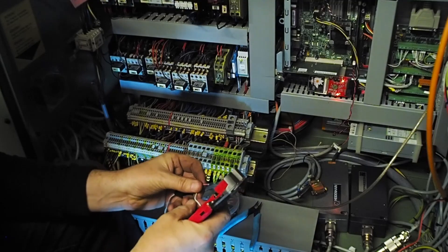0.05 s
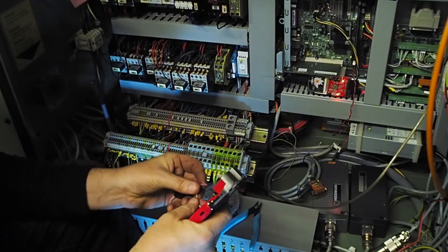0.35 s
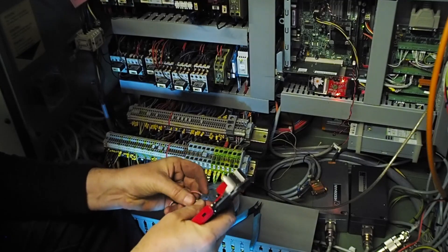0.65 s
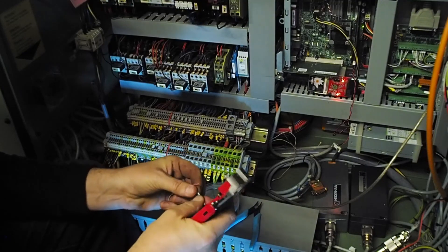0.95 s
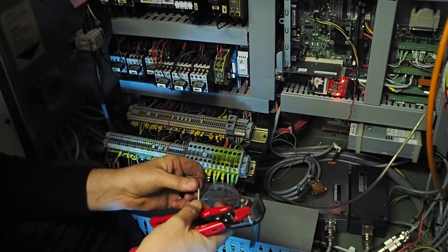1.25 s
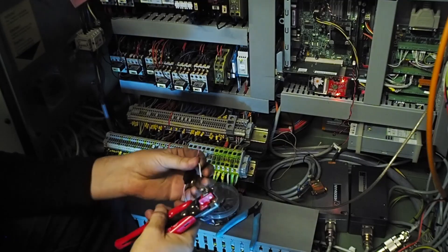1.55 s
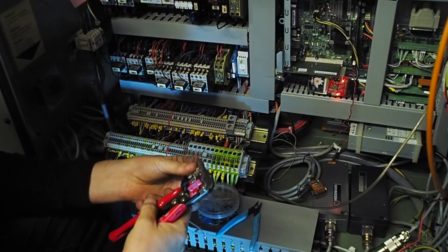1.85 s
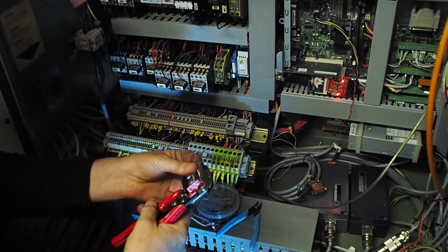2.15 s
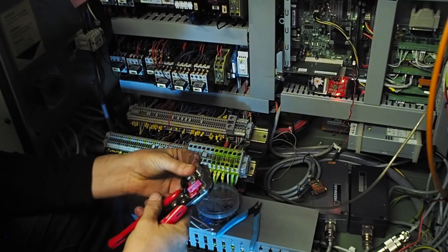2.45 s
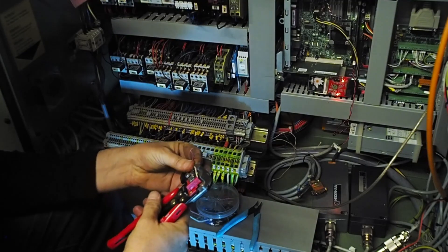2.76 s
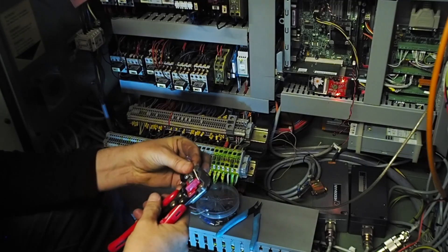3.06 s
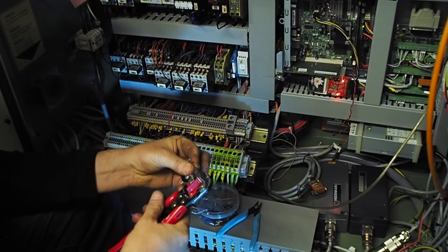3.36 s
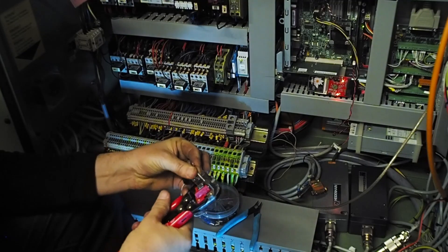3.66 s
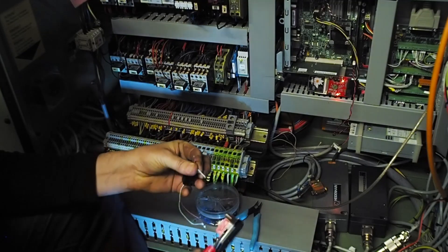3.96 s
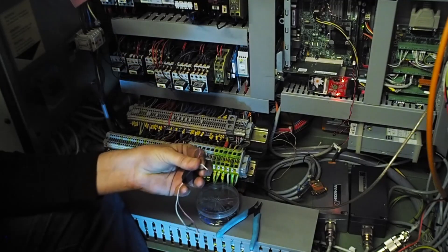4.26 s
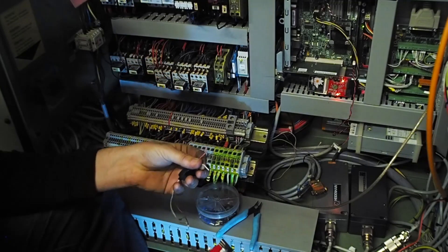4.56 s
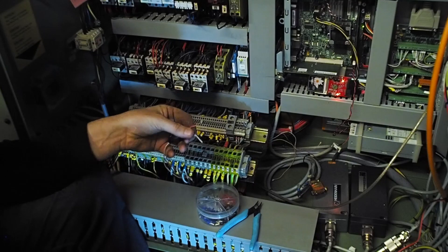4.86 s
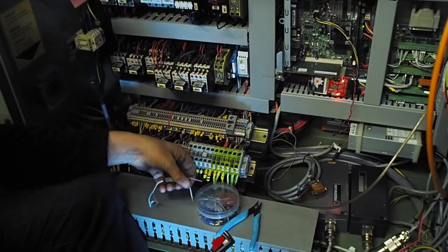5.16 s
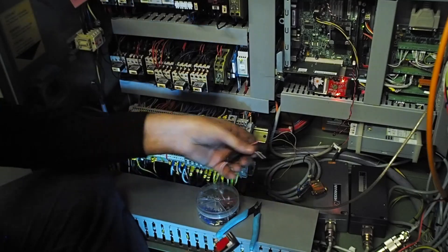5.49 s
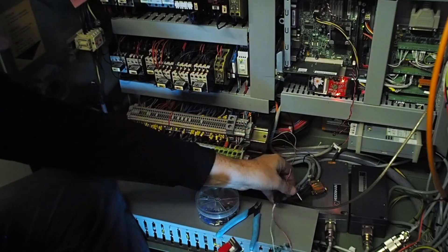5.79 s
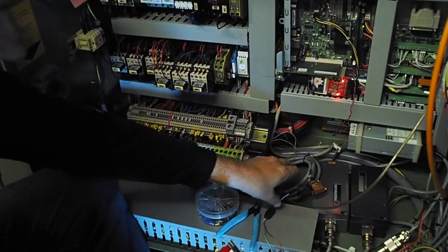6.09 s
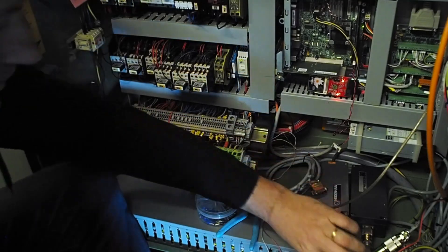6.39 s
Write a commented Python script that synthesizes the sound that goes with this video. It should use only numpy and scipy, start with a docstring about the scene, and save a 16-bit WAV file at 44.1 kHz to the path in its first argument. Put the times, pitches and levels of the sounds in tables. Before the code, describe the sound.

Throughout the six and a half seconds, an open electrical cabinet gives a low, steady transformer hum with the even rush and faint tones of a cooling fan. Hand tools work close by, slightly right of centre, with a short workshop echo. A wire stripper ticks faintly at the start, a little more clearly at 0.7 seconds. Crimping pliers give tiny, brief creaks around 2.6 and 3.5 seconds. At 4 seconds the ratchet clicks twice quickly and the jaws spring open with a sharp, bright metallic snap. A sleeve rustles faintly from about 4.9 seconds, with a few tiny wire squeaks. The wire taps plastic at 5.1 and 5.7 seconds, and between these, at 5.4, a terminal clinks sharply on metal. At 6 seconds a tool lands on a hollow plastic duct with a distinct knock, followed by a faint tick as the hum continues.

```python
"""Work at an open electrical cabinet. From the start, transformers hum and a cooling fan runs.
A stripper ticks and snips a wire; ratchet pliers creak as they crimp a terminal, then near 4 s the pawl
slips and the jaws spring open. A sleeve rustles, the wire squeaks and taps, the terminal clinks on
metal, and near 6 s a tool knocks on a plastic cable duct. Each impact excites the damped modes of
its object and is followed by reflections from the cabinet and the workshop."""
import sys
import numpy as np
from scipy import signal
from scipy.fft import rfft, irfft
from scipy.io import wavfile
from scipy.ndimage import uniform_filter1d

SR = 44100
rng = np.random.default_rng(int(sys.argv[2]) if len(sys.argv) > 2 else 0)


def unload_audio(sound):
    """Save the sound as a 16-bit wav file, at the path given as the first command line argument."""
    columns = np.transpose(np.atleast_2d(sound))
    # keep every value between -1 and 1, then stretch to whole-number steps
    steps = np.round(np.clip(columns, -1, 1) * 32767)
    wavfile.write(sys.argv[1], SR, steps.astype(np.int16))


N = 283563

# contact spectrum of creaks and squeaks: (f/Hz, level/dB)
FRICTION_COLOUR = [(150, -25), (700, -7.5), (1350, -4), (1800, -2.5), (2600, -6), (4300, -11.5),
                   (9000, -24), (11000, -34), (15000, -35)]


def plier_jaws():
    """Elastic release: the jaws let go, spring open against their stop and rebound."""
    releases = [(4.0542, -26, 1), (4.0595, -19.5, -1)]  # impacts: (t/s, level/dB, tilt/(dB/octave))
    colour = [(250, -36), (900, -21.5), (1900, -12), (2400, -11), (3000, -2.5), (3700, -5), (4900, -2),
              (5700, -7.5), (6900, -12.5), (8400, -1.5), (10300, -10), (12300, -1.5), (15500, -14.5)]  # contact spectrum: (f/Hz, level/dB)
    modes = [(2220, -14.5, 0.19), (2780, 4, 0.028), (3110, -23, .4), (3106, 8, 0.033), (4240, -8, 0.087),
             (4630, -4, 0.082), (4770, -11, .2), (4900, -17, 0.12), (8600, -6, .1), (8620, -7, 0.081),
             (9700, -14, .1), (12120, -10, 0.085)]  # jaw resonances: (f/Hz, level/dB, T60/s)
    snaps = blows(releases, contact_ms=3.5, ring_db=-5)
    snaps = bouncing(snaps, gap_s=.0053, loss_db=13, contact_ms=1.3, brighter_db=-2, damped_db=11)
    return strikes(snaps, colour, modes, cabinet_db=-.5, cabinet_t60=.091, room_db=-9.5, side=.61)


def ratchet_pawl():
    """Impact excitation: the pawl slips over each tooth, lands and rebounds."""
    slips = [(3.9776, -33, -1.5), (4.011, -30.5, 0)]  # tooth impacts: (t/s, level/dB, tilt/(dB/octave))
    colour = [(300, -37), (1400, -17), (2800, -9.5), (4200, -0.5), (5100, 1.5), (6500, -10.5), (8800, -2),
              (11000, -11.5), (15000, -14)]  # contact spectrum: (f/Hz, level/dB)
    modes = [(4740, -4, 0.059), (5060, 2, 0.074), (5430, -17, .07), (8300, -24, .06)]  # pawl resonances: (f/Hz, level/dB, T60/s)
    teeth = blows(slips, contact_ms=1.3, ring_db=-1)
    teeth = bouncing(teeth, gap_s=.0043, loss_db=7.5, contact_ms=1.7, brighter_db=1, damped_db=5)
    return strikes(teeth, colour, modes, cabinet_db=4.5, cabinet_t60=.059, room_db=-5, side=.63)


def plier_creaks():
    """Stick-slip friction: handles, pivot and terminal give way in brief jerks under load."""
    slips = [(2.5575, -47, -3.5), (2.6, -55, -1.5), (3.5402, -45, 10), (3.5503, -41.5, 7.5),
             (4.277, -46, -2.5), (4.289, -46, 0)]  # jerks: (t/s, level/dB, tilt/(dB/octave))
    modes = [(1671, 9, 0.1), (1820, 8, 0.11), (2273, -13, 0.071)]  # pivot resonances: (f/Hz, level/dB, T60/s)
    jerks = blows(slips, contact_ms=1.9, ring_db=-7)
    return strikes(jerks, FRICTION_COLOUR, modes, cabinet_db=3.5, cabinet_t60=.11, room_db=-8.5, side=.71)


def terminal_clink():
    """Free vibration: the crimped terminal snaps against metal and rings."""
    impacts = [(5.3998, -19.5, 2)]  # snap: (t/s, level/dB, tilt/(dB/octave))
    colour = [(100, -45), (400, -7.5), (1100, -6), (1900, -0.5), (2450, -9), (3300, 2), (5000, -0.5),
              (6300, 2.5), (7400, -2), (8300, -4.5), (13000, -6.5), (15500, -8)]  # contact spectrum: (f/Hz, level/dB)
    modes = [(1490, -18.5, 0.4), (1830, -12, 0.12), (2013, -6.5, 0.15), (3480, -7, 0.085), (4980, 0, 0.07),
             (5360, -9, 0.12), (6300, -11, 0.16), (7220, -1, 0.043), (7370, 4.5, 0.03), (7370, 12, 0.024),
             (7900, -18, .16), (9100, 4, 0.035)]  # metal resonances: (f/Hz, level/dB, T60/s)
    clinks = blows(impacts, contact_ms=2.8, ring_db=-.1)
    return strikes(clinks, colour, modes, cabinet_db=7, cabinet_t60=.07, room_db=-6.5, side=.64)


def duct_knock():
    """Inelastic collision: a tool lands on the hollow plastic duct and rebounds twice."""
    landing = [(6.0396, -21, 1)]  # impact: (t/s, level/dB, tilt/(dB/octave))
    colour = [(60, -36), (220, -16), (400, -8), (620, 7), (820, -1.5), (1600, -1.5), (2300, -4.5),
              (3600, 0.5), (5800, -5.5), (7500, -13.5), (9000, -8.5), (11500, -17.5), (15500, -21)]  # contact spectrum: (f/Hz, level/dB)
    modes = [(496, -5, 0.039), (575, -19, .1), (626, -6.5, 0.25), (708, 2, 0.072), (958, 2, 0.23),
             (1023, -14, 0.56), (1220, -13, 0.31), (1520, -16, 0.12), (1642, -14.5, 0.33)]  # duct resonances: (f/Hz, level/dB, T60/s)
    knocks = blows(landing, contact_ms=2.2, ring_db=-7.5)
    knocks = bouncing(knocks, gap_s=.0049, loss_db=9, contact_ms=2, brighter_db=-1.5, damped_db=4,
                      gap_growth=1.73, count=2)
    return strikes(knocks, colour, modes, cabinet_db=-1, cabinet_t60=.087, room_db=-12.5, side=.73)


def wire_taps():
    """Impact noise: wire and fingers tap the plastic terminal blocks, which ring only weakly."""
    impacts = [(5.142, -29.5, -1.5), (5.736, -42, -7), (5.7412, -35, 4), (5.7432, -40.5, 6),
               (5.748, -35, -0.5)]  # taps: (t/s, level/dB, tilt/(dB/octave))
    colour = [(100, -22), (400, -18), (750, -4), (1000, -6), (1300, -3.5), (1900, -2), (2400, -8),
              (3500, 2.5), (5500, 0), (7200, -2), (9500, 0), (15500, -6.5)]  # contact spectrum: (f/Hz, level/dB)
    modes = [(810, -6, 0.14), (968, -2, 0.12), (1000, 0, 0.17), (1820, -8, .1), (3420, -4, .13),
             (3650, -9, 0.098), (6500, -9, 0.093)]  # block resonances: (f/Hz, level/dB, T60/s)
    taps = blows(impacts, contact_ms=6, ring_db=-13.5)
    return strikes(taps, colour, modes, cabinet_db=-8, cabinet_t60=.07, room_db=-8, side=.73)


def stripper():
    """Transient excitation: snipping and handling set off the stripper's high modes."""
    contacts = [(.077, -59.5, 0), (.208, -55, -6.5), (.7312, -44.5, 0), (2.669, -55, 20), (3.026, -62, 0),
                (4.715, -55.5, 7), (5.228, -52, -3), (5.934, -57, 7), (6.142, -49.5, 2.5)]  # ticks: (t/s, level/dB, tilt/(dB/octave))
    colour = [(300, -31), (1500, -6), (2400, -10), (3100, 0.5), (5500, 1.5), (8000, -6.5), (11000, -12),
              (15000, -21)]  # contact spectrum: (f/Hz, level/dB)
    modes = [(3050, -4, 0.18), (3500, 5, 0.11), (5450, -19, 0.064)]  # tool resonances: (f/Hz, level/dB, T60/s)
    ticks = blows(contacts, contact_ms=7.1, ring_db=-12)
    return strikes(ticks, colour, modes, cabinet_db=-2, cabinet_t60=.09, room_db=-8, side=.75)


def wire_squeaks():
    """Friction excitation: the insulation slips in the fingers and rings briefly."""
    squeaks = [(4.935, -54.5), (5.897, -51), (6.297, -57)]  # slips: (t/s, level/dB)
    modes = [(2070, -1, 0.04), (2260, -5, 0.046)]  # insulation resonances: (f/Hz, level/dB, T60/s)
    slips = blows([(s, db, 0) for s, db in squeaks], contact_ms=8, ring_db=2)
    return strikes(slips, FRICTION_COLOUR, modes, cabinet_db=8, cabinet_t60=.08, room_db=-6, side=.8)


def blows(rows, contact_ms, ring_db, halving_tilt_db=6.5):
    """Contact stiffness: a harder, brighter blow is shorter.
    Returns rows of (t/s, level/dB, contact/ms, tilt/(dB/octave), ring re crack/dB)."""
    return [(s, db, contact_ms * 2 ** (-tilt / halving_tilt_db), tilt, ring_db) for s, db, tilt in rows]


def bouncing(events, gap_s, loss_db, contact_ms, brighter_db, damped_db, gap_growth=1, count=1):
    """Restitution: weaker rebounds that ring less follow each blow; the first loses the most."""
    out = list(events)
    for s, db, _, tilt_db, ring_db in events:
        for k in range(count):
            s += gap_s * gap_growth ** k
            rebound_db = db - loss_db * (1 + k / 10)
            rebound_tilt = tilt_db + brighter_db * (k + 1)
            out.append((s, rebound_db, contact_ms * (k + 1), rebound_tilt, ring_db - damped_db))
    return out


def strikes(events, colour, modes, cabinet_db, cabinet_t60, room_db, side, size=32768):
    """Superposition: each blow sums a contact crack, cabinet reflections, room tail and damped modes."""
    out = np.zeros((2, N + size))
    t, hz = np.arange(size) / SR, np.fft.rfftfreq(size, 1 / SR)
    head = t < .01  # levels refer to the first 10 ms
    f, mode_db, t60 = np.transpose(modes)
    pulse = undb(8.5) * (t == 0)  # one clean pulse opens each contact
    hands_pan = undb([[-1.25], [1.25]])  # the hands work right of centre
    for s, db, contact_ms, tilt_db, ring_db in events:
        contact = np.exp(-t * 1000 / max(contact_ms, .2))
        crack = pulse + stereo_noise(size, side) * contact
        crack /= np.sqrt(np.mean((pulse ** 2 + contact ** 2)[head]))
        cabinet = stereo_noise(size, side) * fade(t, cabinet_t60) * (1 - fade(t, .016))
        burst = crack * hands_pan + undb(cabinet_db) * cabinet + undb(room_db) * workshop(t)
        body = coloured(burst, curve_db(colour, hz) + tilt_db * np.log2(np.maximum(hz, 300) / 3000))
        # the shorter its wavelength, the more a mode differs in phase between the microphones
        spread = side * np.minimum(f / 3000, 1) * rng.choice([-1, 1], len(f))
        phase = rng.uniform(0, 2 * np.pi, len(f)) + np.array([spread, -spread])
        decays = undb(mode_db + tilt_db * np.log2(f / f.mean()))[:, None] * fade(t, t60[:, None])
        decays /= np.sqrt(np.mean(decays[:, head] ** 2, axis=1).sum() / 2)
        partials = decays * np.sin(2 * np.pi * f[:, None] * t + phase[..., None])
        ring = partials.sum(1) * (1 - fade(t, .0033))
        hit = (body / body[:, head].std() + undb(ring_db) * ring) / np.hypot(1, undb(ring_db))
        start = int(s * SR)
        out[:, start:start + size] += undb(db) * hit
    return out[:, :N]


def workshop(t, low_t60=.63, mid_t60=.37, high_t60=.18):
    """Reverberation: a diffuse field builds up and decays, the treble first."""
    hz = np.fft.rfftfreq(len(t), 1 / SR)
    centres = np.geomspace(500, 16000, 6)
    t60s = np.interp(centres, [500, 4000, 14000], [low_t60, mid_t60, high_t60])
    noise = rfft(stereo_noise(len(t), 1))
    bands = [irfft(noise * np.interp(hz, centres, row)) for row in np.eye(len(centres))]
    return sum(band * fade(t, t60) for band, t60 in zip(bands, t60s)) * (1 - fade(t, .018))


def transformers(mains_hz=50.03, waver_db=.46):
    """Magnetostriction: iron cores flex once each half cycle, so their harmonics peak together."""
    harmonics = [(2, -56), (3, -83), (4, -61.5), (5, -70.5), (6, -75.5), (8, -72), (10, -70.5), (12, -70),
                 (16, -76)]  # hum: (multiple of the mains frequency, rms level/dB)
    phase = 2 * np.pi * mains_hz * np.arange(N) / SR
    stereo_phase = np.array([[.25], [-.25]])
    return np.sqrt(2) * sum(undb(db + waver_db * walk(4.27)) * np.cos(multiple * phase + stereo_phase)
                            for multiple, db in harmonics)


def fan_tones(shaft_hz=76.2, speed_drift=.000513, waver_db=1.35, wander_rad=.79):
    """Rotational noise: harmonics of the shaft speed waver in the draught."""
    harmonics = [(3, -71), (5, -72), (6, -71.5), (7, -65), (12, -75.5), (14, -73), (16, -74), (17, -80.5),
                 (23, -77.5), (30, -82), (31, -78), (32, -86), (36, -80.5), (44, -82), (57, -80), (63, -84),
                 (67, -82.5)]  # tones: (multiple of the shaft speed, rms level/dB)
    turns = np.cumsum(shaft_hz * (1 + speed_drift * walk(2.98))) / SR
    out = 0
    for multiple, db in harmonics:
        phase = rng.uniform(0, 2 * np.pi) + wander_rad * walk(7) + np.array([[-.25], [.25]])
        out += undb(db + waver_db * walk(7.7)) * np.sin(2 * np.pi * multiple * turns + phase)
    return np.sqrt(2) * out


def fan_air(level_db=-55.5, swell_db=.33, ripple_db=1.5, ripple_hz=22, edge_hz=5150, lag_ms=.057):
    """Flow noise: the fan's even rush, coloured by panel resonances and the cabinet's standing waves."""
    spectrum = [(20, -19), (58, -0.5), (130, -2), (240, -3.5), (320, -8), (540, -7), (760, -4.5),
                (860, -7.5), (1270, -5), (1400, -14), (1600, -6.5), (2100, -13), (3000, -10.5), (5100, -13)]  # rushing air: (f/Hz, relative spectral level/dB)
    panels = [(650, 81, 7.5), (966.5, 49, 7.5), (1176, 130, 3.5), (1670, 26, 0), (4230, 210, 1)]  # panel resonances: (f/Hz, bandwidth/Hz, gain/dB)
    hz = np.fft.rfftfreq(N, 1 / SR)
    panel_db = sum(peak / (1 + (2 * (hz - f) / band) ** 2) for f, band, peak in panels)
    grid = np.arange(0, SR / 2, ripple_hz)
    ripple = np.interp(hz, grid, rng.standard_normal(N)[:len(grid)])
    standing_db = ripple_db * ripple * np.minimum(hz / 1500, 1)
    gain = undb(curve_db(spectrum, hz) + panel_db + standing_db) / np.sqrt(1 + (hz / edge_hz) ** 30)
    # long waves reach both microphones alike, short ones almost unrelated
    mid, side = rfft(rng.standard_normal((2, N)))
    width = np.minimum(np.hypot(.23, hz / 1900), .85)
    # the fan stands to the right, so the left microphone hears it a little later
    delay = np.exp(-2j * np.pi * hz * lag_ms / 1000)
    both = np.array([(mid + width * side) * delay, mid - width * side]) / np.hypot(1, width)
    return unit(irfft(both * gain, N)) * undb(level_db + swell_db * walk(4.81))


def sleeve(band_hz=(2500, 11000), grain_db=.9):
    """Friction noise: cloth brushes in a faint hiss that swells and fades with each arm movement."""
    movements = [(4.9, 0.14, -61.5), (5.49, 0.43, -64.5), (6.42, 0.1, -66)]  # swells: (centre t/s, half length/s, level/dB)
    band = signal.butter(1, band_hz, "bandpass", fs=SR, output="sos")
    t = np.arange(N) / SR
    swell = sum(undb(db) * np.exp(-((t - middle) / half) ** 2) for middle, half, db in movements)
    return unit(signal.sosfilt(band, stereo_noise(N, .99))) * swell * undb(grain_db * walk(150))


def hiss(level_db=-64):
    """Self-noise: the microphones add a smooth, faint hiss."""
    spectrum = [(1000, -3), (5500, -2), (6900, -3.5), (8700, 0.5), (12000, -2), (15700, -3)]  # noise floor: (f/Hz, relative spectral level/dB)
    gain = undb(curve_db(spectrum, np.fft.rfftfreq(N, 1 / SR)))
    return unit(irfft(rfft(stereo_noise(N, 1)) * gain, N)) * undb(level_db)


def supply_whine():
    """Phase modulation: the thin, high tones of the power supplies wander slightly."""
    tones = [(9808, -103), (13162, -92), (13458, -87), (14363, -99)]  # whine: (f/Hz, rms level/dB)
    t = np.arange(N) / SR
    return np.sqrt(2) * sum(undb(db) * np.sin(2 * np.pi * hz * t + walk(12)) for hz, db in tones)


def microphone_pair(x, merge_hz=1100):
    """Diffraction: long waves reach two close microphones alike; their housing shades short ones."""
    shade = [(1300, 1), (2400, -0.5), (8000, -2), (13500, 3)]  # acoustic shadow: (f/Hz, left minus right level/dB)
    mid = x.mean(0)
    side = signal.sosfilt(signal.butter(1, merge_hz, "highpass", fs=SR, output="sos"), x[0] - mid)
    shade_db = curve_db(shade, np.fft.rfftfreq(N, 1 / SR)) / 2
    return irfft(rfft(np.array([mid + side, mid - side])) * undb([shade_db, -shade_db]), N)


def coloured(x, gain_db):
    """Minimum-phase filter with the given gain per bin: nothing sounds before the blow."""
    size = x.shape[-1]
    cepstrum = irfft(np.log(undb(gain_db)))
    cepstrum[1:size // 2] *= 2
    cepstrum[size // 2 + 1:] = 0
    return irfft(rfft(x) * np.exp(rfft(cepstrum)))


def undb(db):
    """Level to amplitude ratio."""
    return 10 ** (np.asarray(db) / 20)


def unit(x):
    """Normalisation to rms 1."""
    return x / np.sqrt(np.mean(x ** 2))


def curve_db(points, hz):
    """Interpolation of (f/Hz, level/dB) points on a log-frequency axis."""
    f, db = np.transpose(points)
    return np.interp(np.log(hz + 1), np.log(f), db)


def walk(rate_hz):
    """Low-pass noise: a smooth random drift of rms 1."""
    hold = int(SR / rate_hz)
    steps = np.repeat(rng.standard_normal(N // hold + 1), hold)
    return unit(uniform_filter1d(uniform_filter1d(steps, hold), hold)[:N])


def stereo_noise(size, side):
    """Partial coherence: white noise, alike in both channels at side 0, unrelated at 1."""
    m, s = rng.standard_normal((2, size))
    return np.array([m + side * s, m - side * s]) / np.sqrt(1 + side ** 2)


def fade(t, t60):
    """Exponential decay, 60 dB in t60."""
    return np.exp(-np.log(1000) * t / t60)


def scene():
    """Superposition of the handwork and the steady sound of the cabinet."""
    tools = stripper() + plier_creaks() + ratchet_pawl() + plier_jaws()
    wiring = wire_squeaks() + wire_taps() + terminal_clink() + duct_knock()
    cabinet = transformers() + fan_tones() + supply_whine() + fan_air()
    return microphone_pair(tools + wiring) + cabinet + hiss() + sleeve()


def record(dry, top_hz=15750):
    """Band limiting: a steep low-pass removes the top of the treble."""
    return signal.sosfilt(signal.ellip(10, .2, 80, top_hz, fs=SR, output="sos"), dry)


dry = scene()
out = record(dry)
unload_audio(out)
```